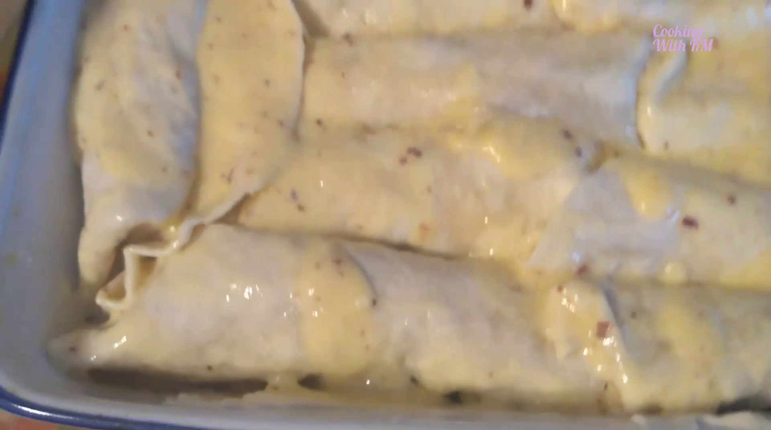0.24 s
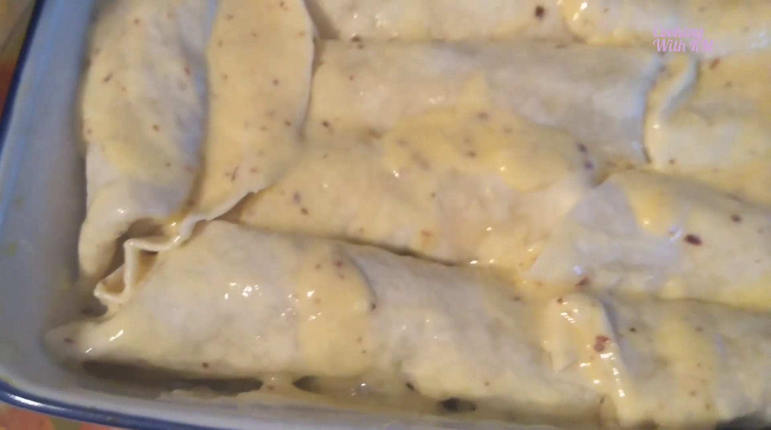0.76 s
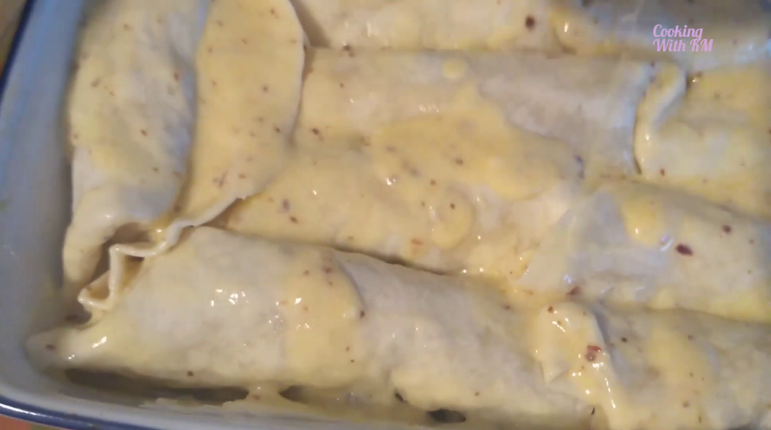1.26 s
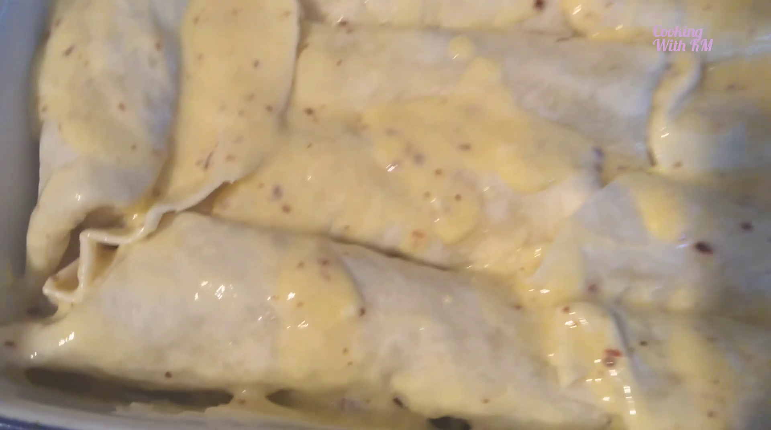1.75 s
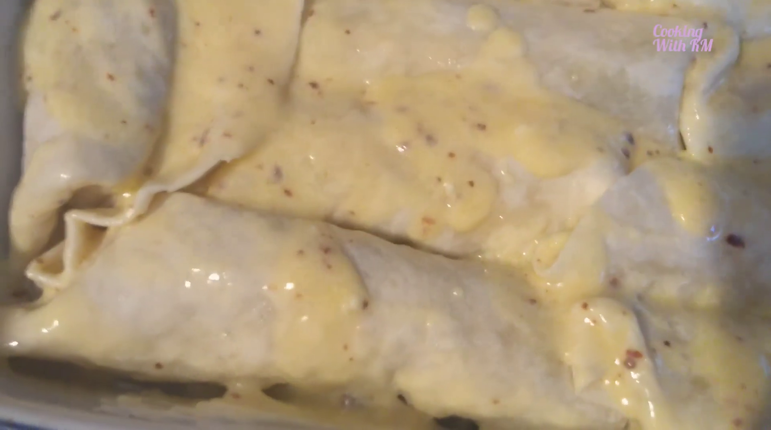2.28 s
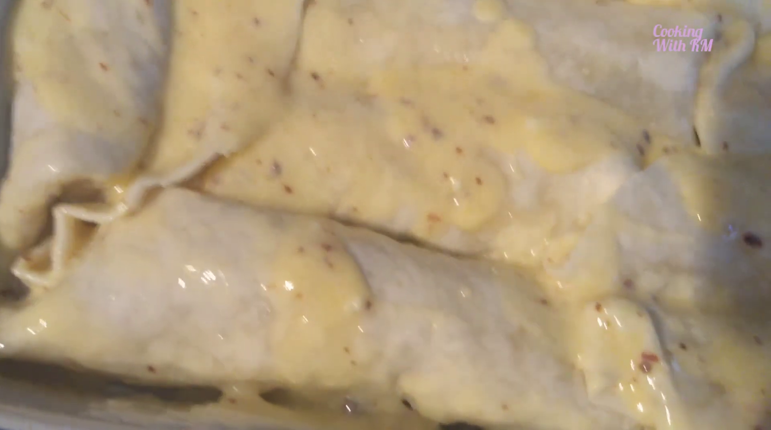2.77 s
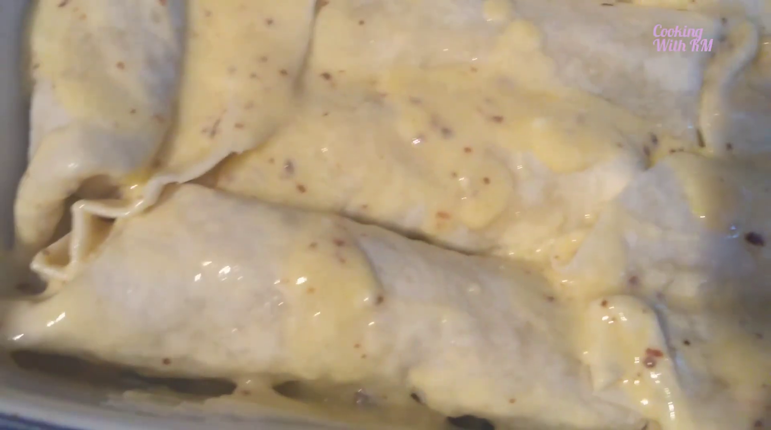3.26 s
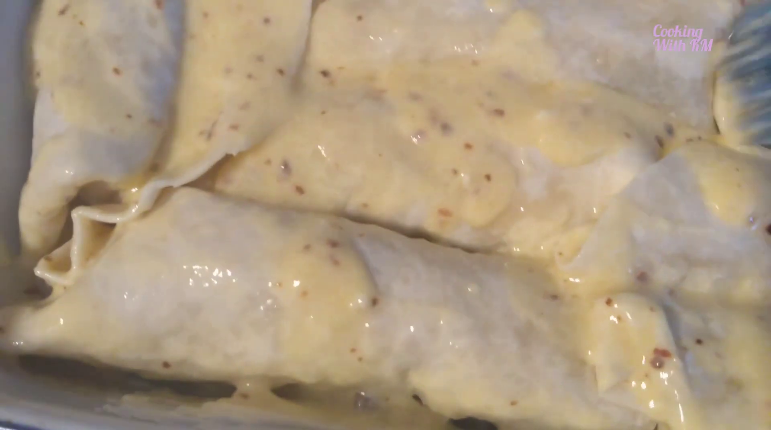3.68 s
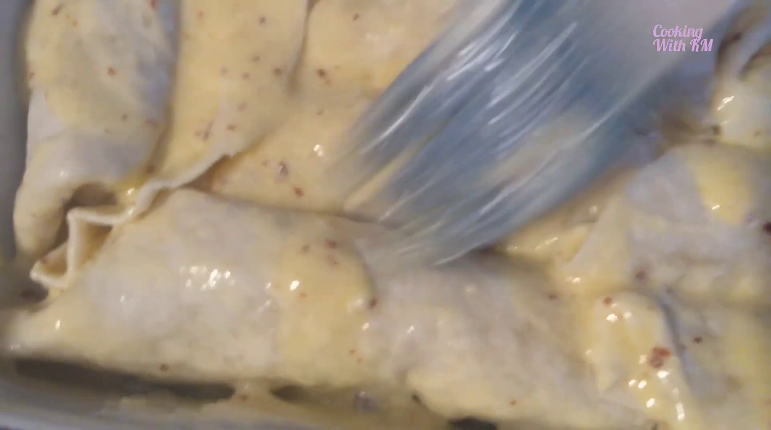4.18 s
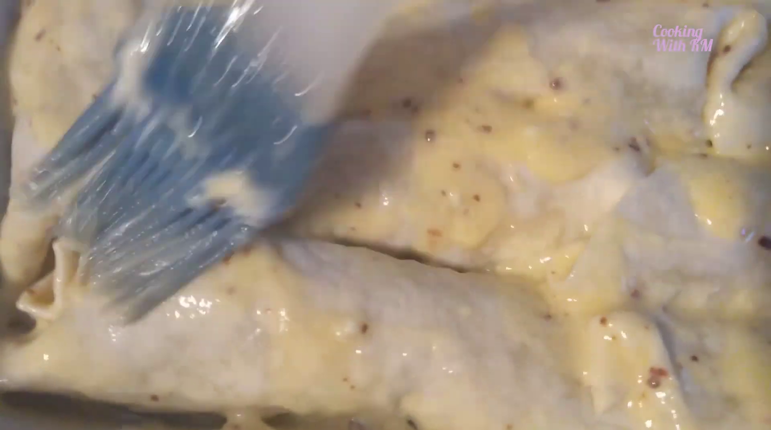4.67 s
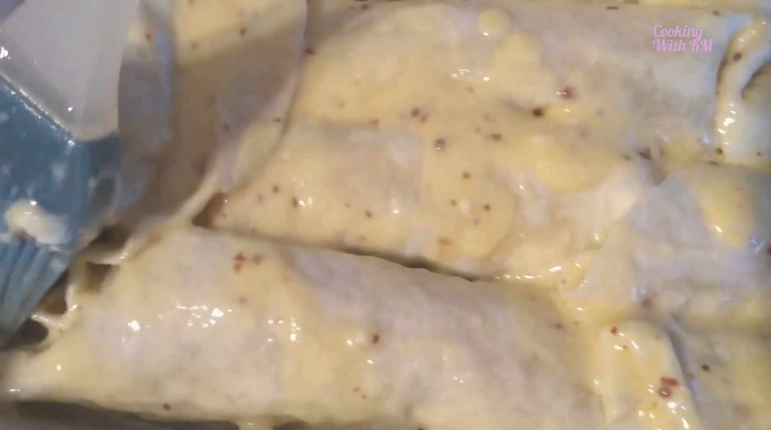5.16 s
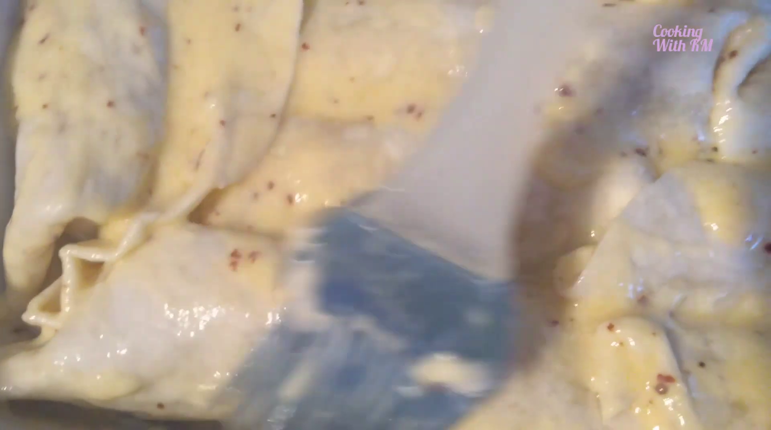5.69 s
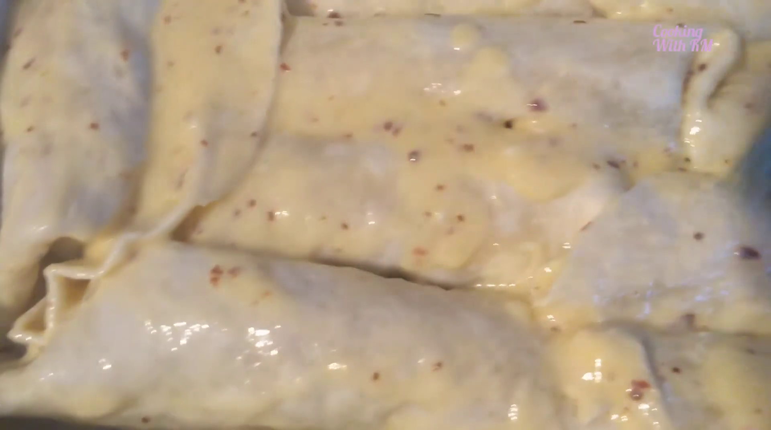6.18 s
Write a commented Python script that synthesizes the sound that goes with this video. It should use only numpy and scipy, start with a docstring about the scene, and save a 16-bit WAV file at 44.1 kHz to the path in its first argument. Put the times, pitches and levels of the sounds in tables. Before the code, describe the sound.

For the first two seconds there is mostly a low, steady fridge hum around 120 Hz with soft recorder hiss, and barely audible sticky ticks. At 2.3 s a glass bowl is set down with a loud, dull, woody knock; it rocks with lesser knocks at 2.4 to 2.5 s, rubs faintly, then chatters in a very quick rattle until about 2.57 s, leaving a faint rim ring. The hum ducks at the landing and recovers by about 3.6 s. A tiny faint squeak comes at 3.3 s. A crisp click at 3.75 s precedes a wet, grainy bristle slap at 3.8 s and a stronger one at 4.3 s, with soft thuds. Short hard handle taps on the filled dish follow at 4.8, 5.2 (the strongest, doubled), 5.3 and 5.6 s. Small sticky snaps continue to about 6.3 s. Close, wide stereo; short kitchen reflections.

```python
"""A glass bowl is set down on a kitchen counter, rocks and rattles to rest; then a wet silicone brush slaps
the pastry, knocks the baking dish and parts from the coating with small sticky ticks. A fridge hums;
a small stereo recorder adds its hiss and widens the image by feeding each side, late and inverted, to the other."""
import sys
import numpy as np
from scipy import signal
from scipy.fft import rfft, irfft, next_fast_len
from scipy.io import wavfile

SR = 44100
rng = np.random.default_rng(int(sys.argv[2]) if len(sys.argv) > 2 else 0)


def generate_wav(sig):
    """Save sig (samples, or channels by samples) to the path in sys.argv[1] as 16-bit PCM at SR."""
    pcm = np.round(np.clip(np.atleast_2d(sig).T, -1, 1) * 32767).astype(np.int16)
    wavfile.write(sys.argv[1], SR, pcm)


N = 283621

# fridge tones: (Hz, left dB, right dB, left lead rad, waver dB)
HUM = [(56.8, -63, -51, 1.4, 0), (119.8, -42.5, -50, -0.88, 0.7), (164, -59, -61, 0.53, 3), (237.6, -57, -63, 0.68, 2.5),
       (265.6, -64, -61.5, -0.46, 3.5), (487, -67, -76, 0.24, 1.5)]
# recorder hiss, own in each channel: (Hz, dB per Hz)
HISS = [(30, -113.5), (60, -81), (150, -96), (300, -78), (600, -96), (1200, -96), (2500, -102), (5000, -107), (9000, -112), (12000, -118), (14100, -120), (14500, -140)]
# kitchen rumble common to both channels: (Hz, dB per Hz)
RUMBLE = [(30, -100), (100, -82.5), (200, -85), (400, -86.5), (800, -100), (1600, -118)]
# bowl on the counter: (s, blow dB, contact ms)
BOWL_BLOWS = [(2.3245, -6.5, 0.77), (2.335, -16.5, 0.77), (2.4055, -14.5, 1.72), (2.457, -25, 2.6), (2.504, -26, 2.0), (2.657, -45, 2.2)]
# bowl and counter together, each mode reaching the two microphones in its own way: (Hz, dB, t60 s, left-right dB, left lead rad)
BOWL = [(189, -17, 0.17, -3.5, 0.6), (245.2, -7, 0.23, -1, -0.26), (326, 3, 0.1, 1, 0), (380, -6, 0.042, 0, 1.2), (456, -6.5, 0.072, -3, 0.5),
        (554, -13, 0.063, -7.5, 0.4), (678, -9, 0.035, -9, 4), (809, -8, 0.066, -5, 0.5), (1025, -5.5, 0.052, 0, -2.14),
        (1280, -8.5, 0.034, -2, -2.5), (1490, -1.5, 0.014, -13, 4.5), (1770, -6.5, 0.037, -10.5, 2)]
# brush handle on the dish: (s, blow dB, contact ms)
DISH_TAPS = [(4.8163, -25, 0.92), (5.1711, -14, 0.25), (5.213, -23.5, 1), (5.344, -33.5, 1), (5.622, -29, 0.79)]
# the filled dish: (Hz, dB, t60 s, left-right dB, left lead rad)
DISH = [(169, -14.5, 0.15, -8, 1.7), (202, -14.5, 0.19, -7, 1), (342, -3.5, 0.07, -3, 0.1), (521, -8, 0.027, -6.5, -1.2), (878, -1, 0.04, 4.5, -1),
        (1093, -11, 0.037, 3, 0), (1405, -8, 0.043, 0, 1.36), (1715, -4, 0.042, -5.5, 3), (2120, 0, 0.017, -1, 4), (2385, -9, 0.026, -22.5, -1.5),
        (3050, -10, 0.022, 9, 2.5), (3920, 6, 0.014, -1, 2.5)]
# bristles slapping the wet pastry: (s, spray dB, its loudest band Hz, thud dB, thud contact ms, rise ms)
SLAPS = [(3.6781, -73, 1510, -45.5, 1.15, 2.6), (3.7271, -63.5, 2990, -48.5, 1.75, 10.5), (3.8181, -35.5, 5760, -29, 1.13, 3.4), (3.9251, -63, 2490, -46.5, .84, 6.1),
         (4.2021, -67.5, 1100, -44.5, .62, 4.1), (4.3341, -34.5, 6610, -23, 2.0, 7.9), (4.4281, -66, 2010, -43, 1.65, 1.3), (6.0141, -68, 2510, -53.5, .82, 23)]
# colour of the spray: (Hz, dB)
SPRAY = [(600, -2), (1200, -4.5), (2500, 2), (4200, -1.5), (6000, 2), (8200, 0.5), (10000, 2), (12500, -5.5), (15500, -7)]
# dish under the soft pastry: (Hz, dB, t60 s, left-right dB, left lead rad)
THUD = [(341.5, 5, 0.085, 2, 0.3), (397.3, -5.5, 0.23, 1, 0.4), (439, -4.5, 0.236, 4, 0.3), (607, -5.5, 0.11, 14, 1.3), (785, -8, 0.07, -16, 2), (1130, 0.5, 0.062, -4, -2.5)]
# bristles parting from the sticky coating: (s, peak dB, pitch Hz, width Hz, length ms)
TICKS = [(.1925, -48.5, 9000, 7000, 2.5), (1.316, -43.5, 1690, 2500, 9), (3.0113, -49, 7700, 7100, 3), (3.737, -49, 5000, 6000, 3),
         (3.7482, -21, 1100, 4000, .6), (3.7486, -19, 9300, 5760, 1.1), (3.935, -44, 2780, 2500, 4), (4.857, -35.5, 8700, 8000, 4.6),
         (5.666, -46, 7960, 7000, 2.7), (5.7306, -34, 4600, 6000, 3.3), (5.9492, -34, 6500, 2300, 3.8), (6.245, -34, 2500, 4500, 9.2),
         (6.246, -36.5, 12400, 5000, 5.7), (6.250, -31.5, 7400, 2210, 6.3), (6.342, -40.5, 7440, 9000, 4.2)]
# a short faint squeak of two overlapping whistles: (start s, length s, first Hz, last Hz, dB)
SQUEAK = [(3.321, .1, 3400, 3420, -55.5), (3.351, .085, 2745, 2960, -54)]
ROOM_T60 = [(200, 0.29), (1000, 0.32), (4000, 0.3), (12000, 0.15)]   # (Hz, s)
CROSS_S, CROSS_LEFT, CROSS_RIGHT = 0.000479, 0.76, 0.73   # lag and share of the other side
CROSS_LOW_HZ, CROSS_HIGH_HZ = 306, 6340
CUTOFF_HZ = 15500   # fixed
RIM_S, RIM_DB, RIM_HZ, RIM_T60_S = 2.551, -46, 883, .65   # fixed: the free glass rim, struck in the rattle
# hum and hiss start a little low and sag, sink when the bowl lands, hold while it rattles, then climb to full level
EARLY_DB, SAG_DB_PER_S, SUNK_DB, SINK_S, HOLD_S, CLIMB_DB_PER_S = -2, 1.0, -7.5, .04, 0.43, 8.5
BAND_DB, BAND_FROM_HZ, BAND_DB_PER_OCTAVE = 5, 5700, 8   # the lower the loudest band, the more it stands out
TICK_PAN_DB = 3.5
# eight finer threads snap at random while the brush works: span s, peak dB, pitch range Hz, width Hz, length ms
FINE_SPAN_S, FINE_DB, FINE_HZ, FINE_WIDTH_HZ, FINE_MS = (4.2, 7.1), -54.5, (8000, 13000), 3000, 2.5
SQUEAK_RISE_S, SQUEAK_FADE_DB, SQUEAK_BREAKUP = .016, 17, 2.4
# its foot chatters to rest: seven touches, ever closer, swelling to the third and fading after
RATTLE_S, RATTLE_GAP_S, RATTLE_SHRINK, RATTLE_CONTACT_MS = 2.5125, .0098, .89, .7
RATTLE_DB, RATTLE_SWELL_DB, RATTLE_FADE_DB = -11.5, 5.5, 3.0
# the rocking foot rubs on the counter from the landing until the rattle is over
RUB_DB, RUB_END_S, RUB_T60_S, RUB_HZ, RUB_WIDTH_HZ, RUB_TREBLE_DB = -50, 2.56, .35, 950, 1100, -29
SLAP_T60_S, SLAP_PAN_DB = .16, 2.3
SLAP_CONTACT_MS = None


def from_db(db):
    """Gain of a level in dB."""
    return 10 ** (np.asarray(db) / 20)


def at_hz(points, hz):
    """Table value on a log-frequency axis."""
    return np.interp(np.log(hz + 1), np.log(np.array(points)[:, 0]), np.array(points)[:, 1])


def coloured(x, spectrum):
    """Noise shaped by a table of dB."""
    hz = np.fft.rfftfreq(x.shape[-1], 1 / SR)
    return irfft(rfft(x) * from_db(at_hz(spectrum, hz)), x.shape[-1])


def drift(rate):
    """Slow chance of spread 1."""
    steps = rng.standard_normal(int(N / SR * rate) + 2)
    return np.interp(np.arange(N) / SR * rate, np.arange(len(steps)), steps)


def ring(x, hz, t60):
    """A unit click sets a turning pointer of length 1 dying; its imaginary part is the sine."""
    return signal.lfilter([1], [1, -from_db(-60 / (t60 * SR)) * np.exp(2j * np.pi * hz / SR)], x + 1e-18)


def resonance(x, hz, width_hz):
    """Band of gain 1 at its top."""
    r = np.exp(-np.pi * width_hz / SR)
    return signal.lfilter((1 - r * r) / 2 * np.array([1, 0, -1]), [1, -2 * r * np.cos(2 * np.pi * hz / SR), r * r], x)


def add(out, s, sound, pan_db=0):
    """Lay a sound into both channels at time s."""
    i = round(s * SR)
    out[:, i:i + sound.shape[-1]] += (sound * from_db([[pan_db / 2], [-pan_db / 2]]))[:, :N - i]


def blow(modes, contact_ms, crack_db, crack_hz, crack_t60, low_hz):
    """A force pulse of unit area, duller the longer the contact, strikes each mode a little differently."""
    t = np.arange(int(.4 * SR)) / SR
    force = t * np.exp(-t * 4000 / max(contact_ms, .1))
    force, out = force / force.sum(), 0
    for hz, level_db, t60, pan_db, lead in modes:
        sides = from_db([[pan_db / 2], [-pan_db / 2]]) * np.exp(.5j * lead * np.array([[1], [-1]]))
        out = out - from_db(level_db + rng.normal()) * (sides * ring(force, hz, t60)).imag
    crack = rng.standard_normal((2, len(t))) * from_db(crack_db - 60 * t / crack_t60)   # modes too dense to tell apart
    crack = resonance(signal.fftconvolve(crack, force[None, :200], axes=1)[:, :len(t)], crack_hz, 0.96 * crack_hz)
    return signal.sosfilt(signal.butter(6, low_hz, "high", fs=SR, output="sos"), out + crack)   # a small body radiates no deep bass


def bowl():
    """Dull knocks through the counter; the rim sings on once the bowl stands."""
    out, click, k = np.zeros((2, N)), np.zeros(N), np.arange(7)
    times = RATTLE_S + np.cumsum(RATTLE_GAP_S * RATTLE_SHRINK ** k) - RATTLE_GAP_S
    levels_db = RATTLE_DB - np.maximum(RATTLE_SWELL_DB * (2 - k), RATTLE_FADE_DB * (k - 2))
    rattle = [(s, level_db, RATTLE_CONTACT_MS) for s, level_db in zip(times, levels_db)]
    for s, blow_db, contact_ms in BOWL_BLOWS + rattle:
        add(out, s, from_db(blow_db) * blow(BOWL, contact_ms, crack_db=6.5, crack_hz=2300, crack_t60=0.051, low_hz=186))
    click[round(RIM_S * SR)] = from_db(RIM_DB)
    return out + ring(click, RIM_HZ, RIM_T60_S).imag


def dish():
    """Short hard taps, damped by the filling."""
    out = np.zeros((2, N))
    for s, blow_db, contact_ms in DISH_TAPS:
        add(out, s, from_db(blow_db) * blow(DISH, contact_ms, crack_db=2.2, crack_hz=3300, crack_t60=0.075, low_hz=109))
    return out


def slaps():
    """Many bristles land within a few ms: a grainy spray with one louder band, over a soft thud in two pushes."""
    out, t = np.zeros((2, N)), np.arange(int(.3 * SR)) / SR
    for s, spray_db, band_hz, thud_db, contact_ms, rise_ms in SLAPS:
        shape = np.minimum(t * 1000 / rise_ms, 1) ** 1.04 * from_db(-60 * np.maximum(t - rise_ms / 1000, 0) / SLAP_T60_S)
        noise = rng.standard_normal((3, len(t)))
        grain = from_db(1.6 * rng.exponential(1, len(t)) + 2 * drift(200)[:len(t)])          # fixed: uneven droplets
        spray = coloured((noise[:2] + 0.62 * noise[2]) * grain, SPRAY) * shape
        band_db = BAND_DB + BAND_DB_PER_OCTAVE * np.log2(BAND_FROM_HZ / band_hz)
        add(out, s, from_db(spray_db) * (spray + from_db(band_db) * resonance(spray, band_hz, 620)), SLAP_PAN_DB)
        thud = blow(THUD, contact_ms, crack_db=11.0, crack_hz=780, crack_t60=0.27, low_hz=201)
        add(out, s + rise_ms / 4000, from_db(thud_db - 10.5) * thud, SLAP_PAN_DB)
        add(out, s + rise_ms / 4000 + 1 / THUD[0][0], from_db(thud_db - 0.5) * thud, SLAP_PAN_DB)   # more bristles land a moment later, in step with the lowest mode
    return out


def ticks():
    """A thread of coating snaps: a dying burst in one band."""
    out, t = np.zeros((2, N)), np.arange(int(.05 * SR)) / SR
    fine = [(np.interp(when, [0, 1], FINE_SPAN_S), FINE_DB, np.interp(pitch, [0, 1], FINE_HZ), FINE_WIDTH_HZ, FINE_MS)
            for when, pitch in rng.random((8, 2))]
    for s, peak_db, hz, width_hz, length_ms in TICKS + fine:
        noise = rng.standard_normal((3, len(t)))
        snap = (noise[2] + 2.7 * noise[:2]) * np.exp(-t * 2000 / length_ms)
        snap = resonance(resonance(snap, hz, width_hz), hz, 0.52 * width_hz)
        add(out, s, from_db(peak_db) * snap / np.abs(snap).max(), TICK_PAN_DB)
    return out


def squeak():
    """Each whistle is a gliding sine that rises fast, then fades and breaks up into noise in a band around it."""
    out = np.zeros((2, N))
    for start, length, first_hz, last_hz, level_db in SQUEAK:
        t = np.arange(int(length * SR)) / SR
        middle_hz = (first_hz + last_hz) / 2
        rough = resonance(resonance(rng.standard_normal((2, len(t))), middle_hz, 700), middle_hz, 700)
        tone = np.sin(2 * np.pi * t * (first_hz + (last_hz - first_hz) * t / length / 2)) + SQUEAK_BREAKUP * t / length * rough / rough.std()
        edges = np.minimum(np.minimum(t, length - t) / SQUEAK_RISE_S, 1)
        add(out, start, edges * from_db(level_db - SQUEAK_FADE_DB * (t / length) ** 2) * tone)
    return out


def fridge():
    """Steady motor tones, each standing differently at the two microphones."""
    out, t = np.zeros((2, N)), np.arange(N) / SR
    for hz, left_db, right_db, lead, waver_db in HUM:
        phase = 2 * np.pi * (hz * t + rng.random())
        level = from_db([[left_db], [right_db]] + waver_db * drift(12)) * np.sqrt(2)
        out += level * np.sin(phase + [[lead], [0]])
    return out


def kitchen(x):
    """Reflections: noise dying band by band, alike at both microphones only in the bass."""
    t, tail = np.arange(int(.4 * SR)) / SR, 0
    noise = rng.standard_normal((3, len(t))) * np.minimum(t / 0.0015, 1)
    for low in 110 * 2. ** np.arange(7):  # fixed
        mixed = noise[:2] + 500 / low * noise[2]
        band = signal.sosfilt(signal.butter(2, [low, 2 * low], "band", fs=SR, output="sos"), mixed / mixed.std())
        tail = tail + band * from_db(-60 * t / at_hz(ROOM_T60, low * np.sqrt(2)))
    return signal.fftconvolve(x, tail / np.sqrt(np.sum(tail ** 2) / 2), axes=1)[:, :N]


def background_db():
    """Level of hum and hiss over time."""
    landing = BOWL_BLOWS[0][0]
    times = [0, landing, landing + SINK_S, landing + HOLD_S, landing + HOLD_S - SUNK_DB / CLIMB_DB_PER_S]
    return np.interp(np.arange(N) / SR, times, [EARLY_DB, EARLY_DB - SAG_DB_PER_S * landing, SUNK_DB, SUNK_DB, 0])




def rub():
    """Uneven friction under the rocking bowl: one broad band over a faint hiss."""
    t, noise = np.arange(N) / SR, rng.standard_normal((3, N))
    grit = (noise[2] + 0.6 * noise[:2]) * from_db(2.5 * drift(90))   # fixed
    level = (t > BOWL_BLOWS[0][0]) * from_db(np.interp(t, [RUB_END_S, RUB_END_S + RUB_T60_S], [RUB_DB, RUB_DB - 60]))
    return level * (resonance(grit, RUB_HZ, RUB_WIDTH_HZ) + from_db(RUB_TREBLE_DB) * grit)


def scene():
    """Blows with their room over hum and hiss."""
    knocks, wet = bowl() + dish(), slaps() + ticks() + squeak()
    per_hz = np.sqrt(SR / 2) * rng.standard_normal((3, next_fast_len(N)))
    floor = coloured(per_hz[:2], HISS)[:, :N] + coloured(per_hz[2], RUMBLE)[:N]
    swell = from_db(background_db())
    room = kitchen(from_db(-12.0) * knocks + from_db(-11) * wet)
    return knocks + rub() + wet + room + swell * (from_db(1.5) * floor + fridge())


def record(dry):
    """Each side takes a late, inverted share of the other in the middle band; the top is cut."""
    size = next_fast_len(N + 100)
    hz, both = np.fft.rfftfreq(size, 1 / SR), rfft(dry, size)
    band = (1 - np.exp(-(hz / CROSS_LOW_HZ) ** 2)) * np.exp(-(hz / CROSS_HIGH_HZ) ** 2)
    cross = band * np.exp(-2j * np.pi * hz * CROSS_S) * [[CROSS_LEFT], [CROSS_RIGHT]]
    wide = irfft(both - cross * both[::-1], size)[:, :N]
    return signal.sosfilt(signal.cheby2(12, 70, CUTOFF_HZ, fs=SR, output="sos"), wide)


dry = scene()
out = record(dry)
generate_wav(out)
```